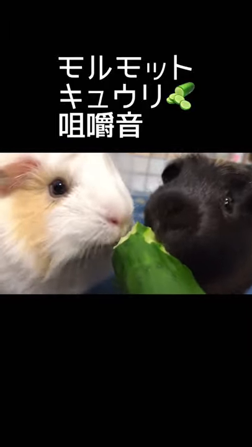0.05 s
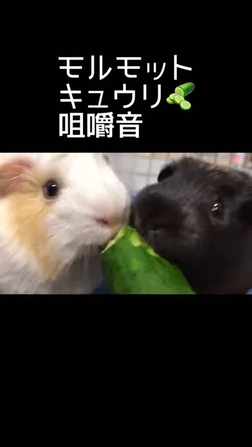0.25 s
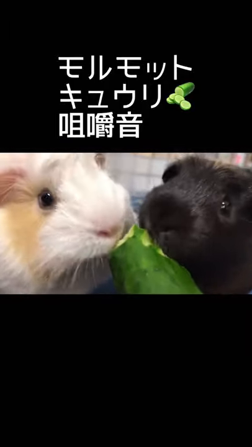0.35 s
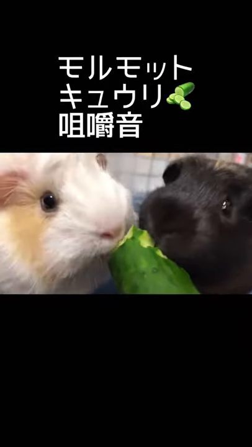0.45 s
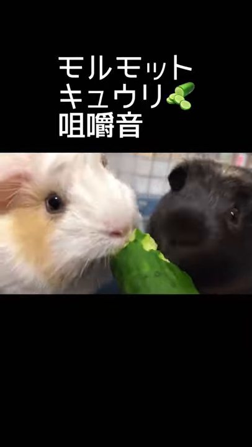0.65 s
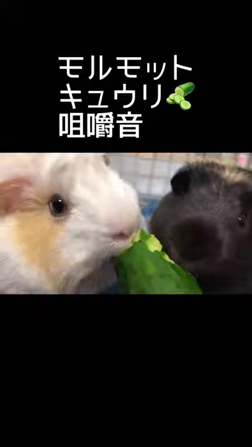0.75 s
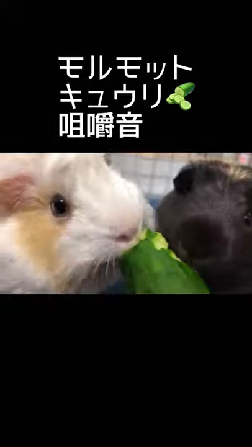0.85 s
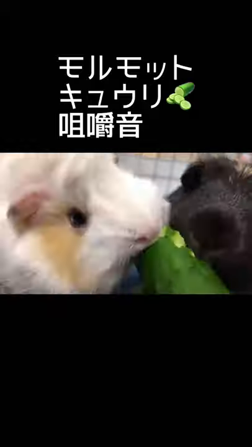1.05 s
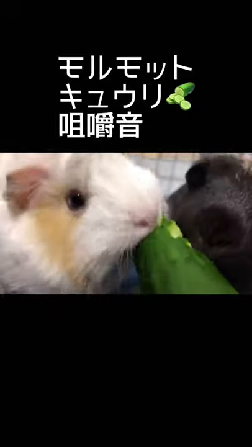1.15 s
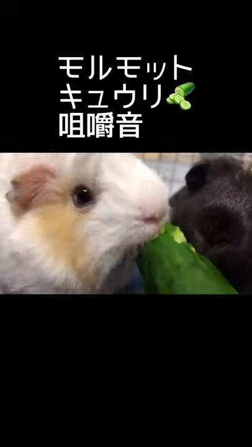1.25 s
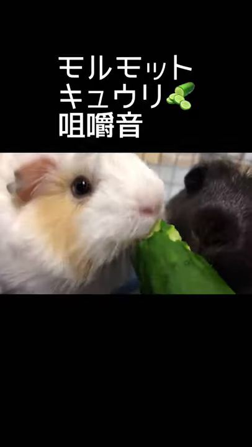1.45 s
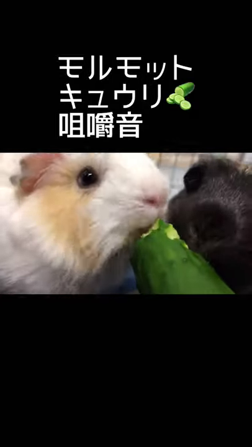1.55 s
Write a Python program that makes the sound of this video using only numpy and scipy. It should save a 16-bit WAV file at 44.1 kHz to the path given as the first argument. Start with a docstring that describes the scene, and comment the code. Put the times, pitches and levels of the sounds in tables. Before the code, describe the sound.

Guinea pigs chew a cucumber close to the microphone. Quick muffled grinding leads into a crisp, juicy bite, then more chewing with wet ticks and a softer second bite. A faint low appliance hum fills the quiet room.

```python
"""Two guinea pigs eat a cucumber close by, in a quiet room with a low appliance hum.
From the start, molars grind in quick, muffled strokes, with small crunches, soft bumps and wet ticks.
Near 0.25 s the front teeth break off a piece: a crisp run of bursting cells inside a wet fizz.
The chewing goes on, a softer bite follows near 1.08 s, and the molars grind again until about 1.5 s."""
import sys
import numpy as np
from scipy import signal
from scipy.fft import rfft, irfft
from scipy.io import wavfile

SR = 44100
rng = np.random.default_rng(int(sys.argv[2]) if len(sys.argv) > 2 else 0)


def store_wav(level_fs):
    """Save 16-bit WAV to argv[1]."""
    pcm = np.round(np.clip(np.atleast_2d(level_fs), -1, 1) * 32767)
    wavfile.write(sys.argv[1], SR, pcm.T.astype(np.int16))


N = 70560  # 1.6 s


def amp(db):
    """Decibels to gain."""
    return 10 ** (np.asarray(db) / 20)


def unit_rms(x):
    """Scales to an rms of one."""
    return x / np.sqrt(np.mean(x ** 2) + 1e-20)


def curve_at(points, hz):
    """Interpolates a table on a log-frequency axis."""
    freq_hz, value = np.transpose(points)
    return np.interp(np.log(hz + 1), np.log(freq_hz + 1), value)


def add(mix, start_s, sound):
    """Mixes a sound in at start_s, cut to fit."""
    at = round(start_s * SR)
    sound = sound[max(-at, 0):]
    part = mix[max(at, 0):][:len(sound)]
    part += sound[:len(part)]


def ring(colour, pitch_hz=1000, width_hz=1000, lift_db=0, size=1024):
    """Minimum-phase response to one pop: a colour with an optional resonance, unit energy."""
    hz = np.fft.rfftfreq(size, 1 / SR)
    resonance_db = lift_db / (1 + (2 * (hz - pitch_hz) / width_hz) ** 2)
    log_gain = np.log(amp(curve_at(colour, hz) + resonance_db))
    mirrored = np.r_[log_gain, log_gain[-2:0:-1]]
    spectrum = np.exp(np.conj(signal.hilbert(mirrored)))
    response = np.fft.ifft(spectrum).real[:size // 2]
    return response / np.linalg.norm(response)


def crackle(envelope, response, pops_per_s, uneven_db):
    """Random pops of uneven size over a faint noise floor, with the energy of the envelope."""
    pop_rng = np.random.default_rng(rng.integers(1 << 30))
    chance, polarity, size = pop_rng.random((len(envelope), 3)).T
    size_db = uneven_db * np.minimum(-np.log(size), 3)
    pops = np.where(chance < pops_per_s / SR, 1, .02) * np.sign(polarity - .5) * amp(size_db)
    sound = signal.fftconvolve(pops * envelope, response)
    return sound * np.linalg.norm(envelope) / np.linalg.norm(sound)


def burst(mix, centre_s, sigma_s, level_db, response, pops_per_s, uneven_db):
    """Mixes in a crackle with a Gaussian envelope."""
    t = np.arange(-4 * sigma_s, 4 * sigma_s, 1 / SR)
    envelope = amp(level_db) * np.exp(-.5 * (t / sigma_s) ** 2)
    add(mix, centre_s + t[0], crackle(envelope, response, pops_per_s, uneven_db))


# Room air spectrum: freq_hz, gain_db
AIR_COLOUR = [(20, -29), (40, -13), (60, 4.5), (115, -1.5), (180, 1), (290, 3), (420, -4.5), (800, -12),
              (1500, -16.5), (2600, -16), (4500, -21), (8000, -25.5), (16000, -27.5)]
# Hum partials: pitch_hz, rms_db
HUM_PARTIALS = [(95.0, -53.5), (284, -72.5)]
def background(air_rms_db=-64.5):
    """Steady hum of an appliance over faint room air."""
    t = np.arange(N) / SR
    air_gain = amp(curve_at(AIR_COLOUR, np.fft.rfftfreq(N, 1 / SR)))
    air = irfft(rfft(rng.standard_normal(N)) * air_gain, N)
    hum = sum(np.sqrt(2) * amp(rms_db) * np.sin(2 * np.pi * (pitch_hz * t + rng.random()))
              for pitch_hz, rms_db in HUM_PARTIALS)
    return amp(air_rms_db) * unit_rms(air) + hum


# Spectrum through the cheeks: freq_hz, gain_db
CHEEK_COLOUR = [(200, -22.5), (500, -9.5), (850, -15), (1400, 0), (2000, -2.5), (2600, 0), (3600, -2),
                (4500, -10.5), (5600, -6.5), (7500, -15), (11000, -17.5), (16000, -25.5)]
# Wet flesh spectrum: freq_hz, gain_db
FIZZ_COLOUR = [(500, -30.5), (2000, -25), (4500, -6), (7000, -7), (10000, 0.5), (12500, -4.5),
               (14500, -0.5), (16000, -3.5)]
# Jaw strokes: start_s, length_s, grind_db, wet_db
JAW_STROKES = [(-.015, 0.07, -56, -73), (0.134, 0.067, -55.5, -72), (0.194, 0.07, -56, -60),
               (0.265, 0.062, -58.5, -61), (.338, 0.066, -62.5, -65.5), (.428, 0.051, -64.5, -61.5),
               (0.473, 0.078, -58.5, -71), (0.584, 0.069, -63, -71), (0.649, 0.08, -58.5, -81),
               (0.724, 0.062, -62.5, -71), (0.804, 0.062, -60.5, -79), (.868, 0.054, -58.5, -70),
               (1.008, 0.046, -56.5, -72.5), (1.039, 0.11, -57, -65), (1.141, 0.044, -61.5, -72),
               (1.199, 0.078, -59.5, -64), (1.276, 0.043, -60, -66), (1.318, 0.067, -61.5, -64.5),
               (1.376, 0.043, -60.5, -69.5), (1.442, 0.059, -60, -75), (1.472, 0.06, -59, -69.5)]
def chewing(attack_s=.0089, release_s=.018, sag_db=-3, lump_db=2.4, lump_s=.009):
    """Lumpy grinding heard through the cheeks, with wet crackle at the lips."""
    out = np.zeros(N)
    for start_s, length_s, grind_db, wet_db in JAW_STROKES:
        t = np.arange(0, length_s, 1 / SR)
        lumps_db = lump_db * np.interp(t / lump_s, np.arange(40), rng.standard_normal(40))
        fade = np.clip(np.minimum(t / attack_s, (length_s - t) / release_s), 0, 1)
        envelope = fade * amp(sag_db * t / length_s + lumps_db)
        grind = crackle(envelope * amp(grind_db), ring(CHEEK_COLOUR), pops_per_s=3500, uneven_db=5.5)
        wet = crackle(envelope * amp(wet_db), ring(FIZZ_COLOUR), pops_per_s=900, uneven_db=7.5)
        add(out, start_s, grind + wet)
    return out


# Molar crunch spectrum: freq_hz, gain_db
MOLAR_COLOUR = [(200, -0.5), (800, -11), (1400, -0.5), (2200, -4), (3400, -1), (4500, -8.5), (5800, -12.5),
                (8000, -18.5), (16000, -29)]
# Molar crunches: centre_s, sigma_s, level_db, pitch_hz, lift_db
MOLAR_CRUNCHES = [(.003, 0.0023, -51, 2290, 8), (0.2058, 0.0016, -47, 5550, 21),
                  (0.2354, 0.0013, -43.5, 3230, 14), (0.2633, 0.0014, -45.5, 3460, 14),
                  (0.651, 0.0017, -46, 1960, 11), (0.6647, 0.0014, -44.5, 1530, 2),
                  (0.706, 0.0056, -62.5, 3940, 32), (0.7338, 0.0041, -57.5, 2540, 11),
                  (.816, 0.0005, -48.5, 2200, 6), (0.8648, 0.0012, -45, 2690, 17.5),
                  (1.0246, 0.00063, -51.5, 2540, 13), (1.0714, 0.0019, -50.5, 1380, 14),
                  (1.0821, 0.0031, -51, 1400, 18), (1.1052, 0.00073, -43.5, 3200, 3),
                  (1.1124, .0006, -45, 3400, 5), (1.21, 0.003, -61.5, 2700, 31),
                  (1.2196, 0.0011, -48, 2650, 24.5), (1.2859, .0025, -56.5, 1500, 3),
                  (1.3502, 0.0016, -48, 2250, 9), (1.4671, 0.0013, -48, 2310, 9)]
def crunches():
    """Pieces give way between the molars, each with a short ring."""
    out = np.zeros(N)
    for centre_s, sigma_s, level_db, pitch_hz, lift_db in MOLAR_CRUNCHES:
        pop = ring(MOLAR_COLOUR, pitch_hz, width_hz=520, lift_db=lift_db)
        burst(out, centre_s, sigma_s, level_db, pop, pops_per_s=3400, uneven_db=7)
    return out


# Soft contact spectrum: freq_hz, gain_db
BUMP_COLOUR = [(120, -14.5), (300, -1.5), (520, 0), (900, -5), (1400, -10.5), (2500, -28.5), (8000, -41)]
# Muzzle bumps: centre_s, sigma_s, level_db, pitch_hz
MUZZLE_BUMPS = [(.053, 0.0067, -61.5, 496), (.213, .009, -61.5, 308), (.378, .012, -64, 520),
                (.622, 0.0045, -60.5, 380), (0.713, 0.0077, -63, 270), (.772, 0.0042, -62.5, 450),
                (0.869, 0.0046, -62, 600), (0.925, 0.0047, -58.5, 667), (1.059, 0.0044, -57, 510),
                (1.093, 0.0036, -57.5, 840), (1.263, 0.0052, -58.5, 389), (1.341, .004, -58, 660),
                (1.396, 0.0058, -61.5, 273), (1.512, .005, -58, 415)]
def bumps():
    """Dull nudges of a muzzle against the cucumber."""
    out = np.zeros(N)
    for centre_s, sigma_s, level_db, pitch_hz in MUZZLE_BUMPS:
        thud = ring(BUMP_COLOUR, pitch_hz, width_hz=64, lift_db=8.5)
        burst(out, centre_s, sigma_s, level_db, thud, pops_per_s=2500, uneven_db=1.5)
    return out


# Tears in the flesh: centre_s, sigma_s, level_db
FLESH_TEARS = [(0.164, 0.017, -81), (0.214, 0.014, -50), (.251, .013, -47), (0.294, 0.0064, -49.5),
               (0.436, 0.006, -62), (1.053, .005, -51), (1.077, 0.0095, -44), (1.102, 0.0085, -52),
               (1.158, .008, -60.5), (1.245, 0.047, -78), (1.32, 0.0039, -51.5), (1.339, 0.0025, -55)]
def tears():
    """Wet flesh fizzes as it tears."""
    out = np.zeros(N)
    for centre_s, sigma_s, level_db in FLESH_TEARS:
        burst(out, centre_s, sigma_s, level_db, ring(FIZZ_COLOUR), pops_per_s=7000, uneven_db=4)
    return out


# Crisp pop spectrum: freq_hz, gain_db
CRISP_COLOUR = [(300, -43.5), (850, -40.5), (1350, -23), (2150, -45), (3150, -15), (4150, -28.5),
                (4700, -13.5), (5200, -13), (6300, -9.5), (6850, -12), (7500, -7.5), (9400, -4),
                (11500, -6), (12800, -4.5), (14300, -3), (15100, 1), (16000, -6.5)]
# Wet ticks: start_s, peak_db, pitch_hz
WET_TICKS = [(0.164, -42, 12100), (.239, -18.5, 12100), (0.2722, -37, 13200), (0.3642, -40, 14500),
             (.4038, -33.5, 12700), (.4312, -34, 7400), (.631, -53, 10000), (0.8853, -39.5, 11000),
             (1.0272, -42.5, 13000), (1.1313, -39.5, 12000), (1.1633, -32.5, 10700), (1.175, -41, 11400),
             (1.2334, -41, 11500), (1.249, -41, 14700), (1.255, -32.5, 10600), (1.26, -32, 13450),
             (1.269, -37.5, 11500), (1.443, -49.5, 9000), (1.594, -55, 13400)]
def ticks(spray_sigma_s=.00097, spray_db=-26.5):
    """Lone pops of juice and tooth tips, each in a faint spray of smaller ones."""
    out = np.zeros(N)
    for start_s, peak_db, pitch_hz in WET_TICKS:
        pop = ring(CRISP_COLOUR, pitch_hz, width_hz=2800, lift_db=10)
        add(out, start_s, amp(peak_db) * pop / abs(pop).max())
        burst(out, start_s, spray_sigma_s, peak_db + spray_db, pop, pops_per_s=2500, uneven_db=4)
    return out


# Front-tooth cracks: centre_s, sigma_s, level_db, pitch_hz
BITE_CRACKS = [(.2064, 0.00055, -58, 13000), (0.2344, 0.00094, -38, 11400), (0.2352, 0.00098, -33, 11000),
               (0.2454, 0.00089, -35, 13500), (0.255, 0.0013, -26, 11100), (0.2567, 0.00015, -23.5, 10600),
               (0.2591, .0008, -30, 9600), (0.2599, 0.00038, -18.5, 9500), (0.2619, 0.00072, -13.5, 11660),
               (0.2629, 0.00055, -35.5, 9300), (0.2735, 0.00055, -35.5, 14000), (0.2856, .001, -43, 14000),
               (0.291, .001, -43, 11730), (.4465, .0012, -58, 12000), (0.4563, .0022, -47, 10400),
               (1.0705, 0.0015, -28.5, 15800), (1.0814, 0.00096, -28.5, 14700), (1.0864, .0006, -47, 14400),
               (1.0913, 0.00065, -38.5, 14600)]
def cracks():
    """Front teeth crack the flesh: avalanches of bursting cells, bright from the open mouth."""
    out = np.zeros(N)
    for centre_s, sigma_s, level_db, pitch_hz in BITE_CRACKS:
        cell = ring(CRISP_COLOUR, pitch_hz, width_hz=2400, lift_db=9)
        burst(out, centre_s, sigma_s, level_db, cell, pops_per_s=14000, uneven_db=2.2)
    return out


# Room decay: freq_hz, t60_s
ROOM_DECAY = [(200, 0.9), (2000, 0.083), (8000, 0.099), (16000, 0.15)]
def room(x, size=256):
    """Short diffuse tail of a small room; the bass lasts longest."""
    hz, t, noise = signal.stft(rng.standard_normal(SR // 2), SR, nperseg=size)
    decay = amp(-60 * t / curve_at(ROOM_DECAY, hz)[:, None])
    _, tail = signal.istft(noise * decay, SR, nperseg=size)
    return signal.fftconvolve(x, tail / np.linalg.norm(tail))[:N]


def scene(bright_send_db=-20.5, dull_send_db=-11):
    """Bright and muffled mouth sounds, their reverb and the background, in mono."""
    bright = cracks() + tears() + ticks()
    dull = chewing() + crunches() + bumps()
    reverb = room(amp(bright_send_db) * bright + amp(dull_send_db) * dull)
    return (bright + dull + reverb + background())[None]


def record(dry, cutoff_hz=15950):
    """Steep low-pass band limit."""
    lowpass = signal.firwin(401, cutoff_hz, window=("kaiser", 8), fs=SR)
    return signal.oaconvolve(dry, lowpass[None], "same")


dry = scene()
out = record(dry)
store_wav(out)
```